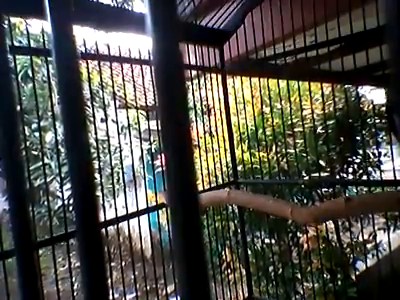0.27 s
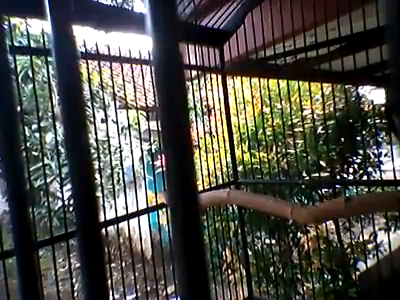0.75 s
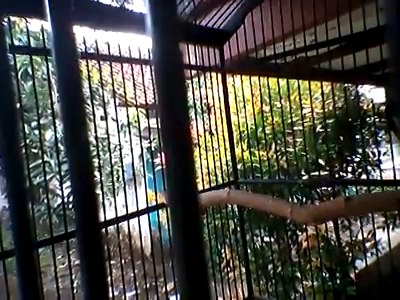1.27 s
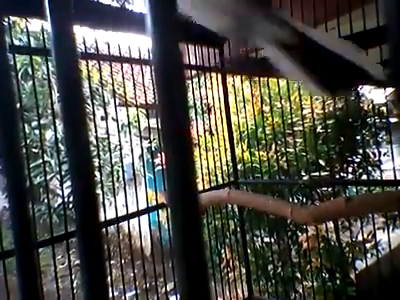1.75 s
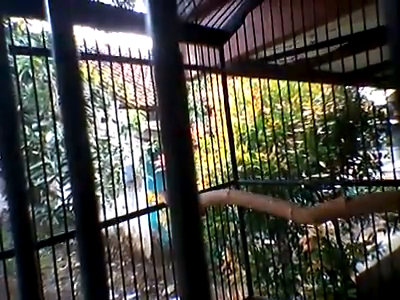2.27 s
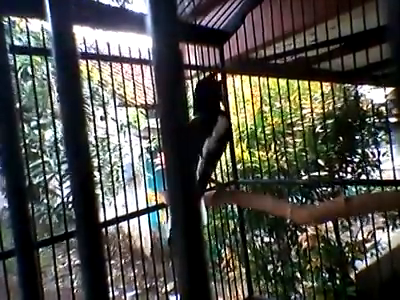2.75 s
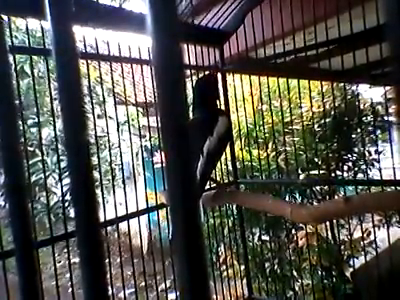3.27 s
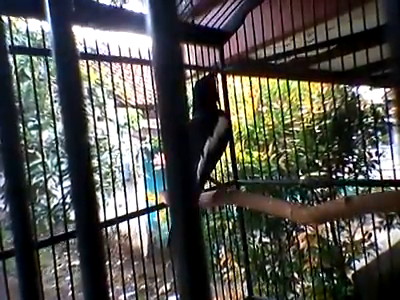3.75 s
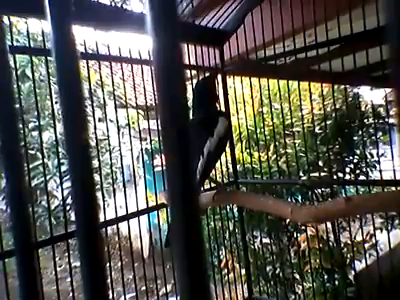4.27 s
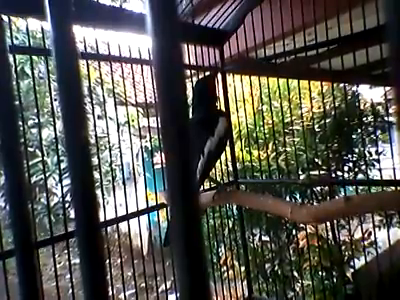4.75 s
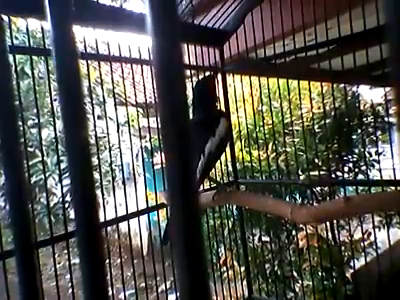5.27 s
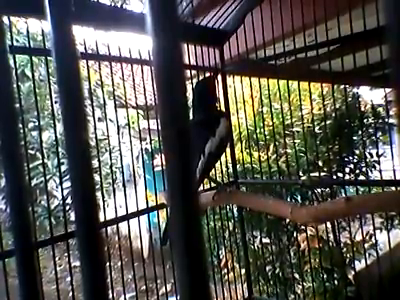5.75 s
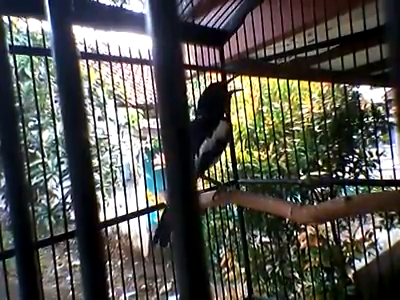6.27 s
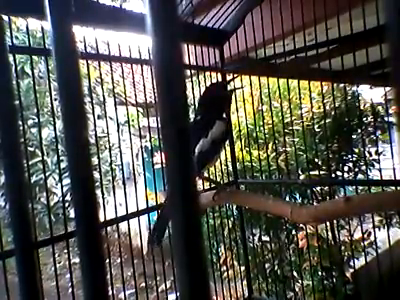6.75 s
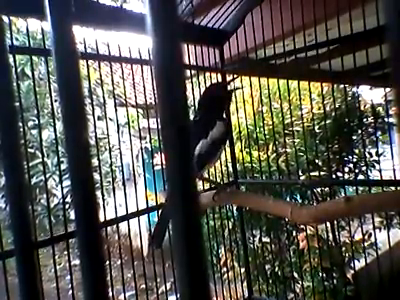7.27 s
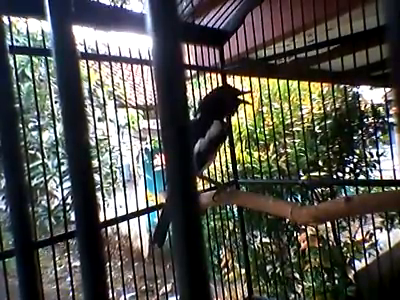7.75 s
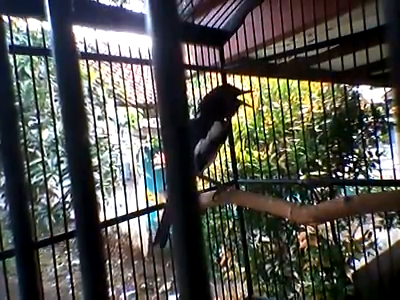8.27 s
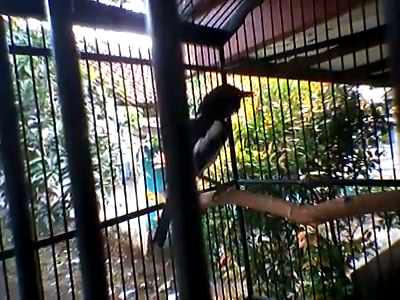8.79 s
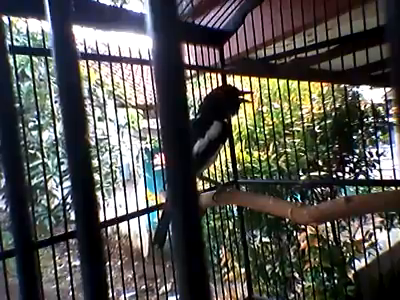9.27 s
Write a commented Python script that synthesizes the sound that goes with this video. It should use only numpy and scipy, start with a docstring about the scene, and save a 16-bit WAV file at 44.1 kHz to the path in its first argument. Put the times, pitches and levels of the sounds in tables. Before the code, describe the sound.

A caged songbird whistles a bright, squeaky bout, flutters across its cage, pauses while a distant bird answers and an engine passes, then sings again.

```python
"""A caged magpie-robin under a porch roof sings a first bout of whistles, sweeps and squeaks: near-sine notes
from two sides of its syrinx, raspy when swept fast or pressed hard. Late in the bout it flaps across the cage
and lands: puffs of shaped noise. An engine drones past: two wavering low orders and exhaust noise. In the
pause a bird answers from further off, dull and echoing. A second bout ends in chips, a falling trill and a
last scoop. Noise-made traffic murmurs throughout."""
import sys
import numpy as np
from scipy import signal
from scipy.fft import rfft, irfft, next_fast_len
from scipy.io import wavfile
from scipy.ndimage import uniform_filter1d

SR = 44100
rng = np.random.default_rng(int(sys.argv[2]) if len(sys.argv) > 2 else 0)


def output_pcm(signal):
    """Save a mono or channel-first signal as 16-bit PCM at the path in sys.argv[1].

    Samples are clipped to [-1, 1] before scaling.
    """
    pcm = np.clip(np.atleast_2d(signal).T, -1, 1) * 32767
    wavfile.write(sys.argv[1], SR, np.round(pcm).astype(np.int16))


N = 419832
TIME = np.arange(N) / SR

# Notes from the other side of the syrinx. Each row: start in seconds, length in seconds, first, middle and
# last pitch in Hz, relative level in dB, place of the crest (0-1), swell up to the crest in dB.
SECOND_VOICE_NOTES = [ (.881, .072, 4750, 3380, 2800, -21, .46, 17),
                      (7.568, .162, 3680, 3470, 3270, -26.5, .4, 20),
                      (9.028, .088, 1990, 2060, 2000, -36.5, .15, 2), ]


def caged_bird(coupling=4.0, overdrive=10, voice_db=3, beak_hz=9950, beak_db=6, lowest_hz=900):
    """The two sides of the syrinx give sum and difference tones; the open beak lifts one resonance."""
    one = sing(song())
    other = sing([arch(*row) for row in SECOND_VOICE_NOTES])
    mixed = coupling * one * other * (1 + overdrive * (one + other))
    mixed = signal.sosfilt(signal.butter(6, lowest_hz, "highpass", fs=SR, output="sos"), mixed)
    voice = gain_of(voice_db) * (one + other + mixed + cracks())
    resonance = signal.lfilter(*signal.iirpeak(beak_hz, 20, fs=SR), voice)
    return voice + gain_of(beak_db) * resonance


# Two long free glides, one list each. Each row: time in seconds, pitch in Hz, relative level in dB.
GLIDE_PATHS = [
    [(6.965, 3490, -36), (6.977, 3673, -27), (6.991, 3621, -24), (7.071, 3080, -20), (7.089, 3036, -28),
     (7.127, 2907, -22), (7.139, 2817, -30), (7.157, 2704, -20), (7.187, 2188, -23), (7.233, 1981, -19),
     (7.25, 1902, -39)],
    [(7.419, 3116, -40), (7.439, 3146, -20), (7.583, 2819, -32), (7.621, 2518, -27), (7.675, 2450, -26),
     (7.707, 2235, -35), (7.735, 2040, -25), (7.763, 2100, -34), (7.787, 2533, -19), (7.875, 2440, -22),
     (7.92, 2010, -40)],
]


def song():
    """Every note of the main voice, each as rows of (s, pitch Hz, relative level dB)."""
    kinds = [(arch, ARCHED_NOTES), (slur, SLUR_NOTES), (scoop, SCOOP_NOTES), (chirp, CHIRP_NOTES),
             (chip, CHIP_NOTES), (squeak, SQUEAK_NOTES), (trill, [TRILL_NOTE])]
    shaped = [shape(*row) for shape, table in kinds for row in table]
    return shaped + list(GLIDE_PATHS)


# Single arched notes. Each row: start in seconds, length in seconds, first, middle and last pitch in Hz,
# relative level in dB, place of the crest (0-1), swell up to the crest in dB.
ARCHED_NOTES = [ (0, .012, 2750, 2800, 2900, -24, .2, 3), (.082, .141, 3330, 3580, 3740, -12.5, .36, 21),
                (.285, .1, 3660, 3480, 3120, -15.3, .33, 10), (.487, .026, 2150, 1780, 2550, -27, .6, 11),
                (.508, .102, 3720, 3440, 2420, -17.2, .2, 5), (1.125, .104, 3230, 3200, 3150, -20, .37, 17),
                (1.24, .093, 3220, 3140, 3060, -20.3, .75, 14),
                (1.345, .075, 3090, 3080, 2880, -19.7, .5, 12),
                (1.911, .069, 5700, 4630, 4200, -28, .26, 21),
                (2.064, .138, 3640, 3450, 3100, -27.2, .85, 14),
                (2.54, .15, 3210, 3690, 3830, -26.8, .3, 19),
                (2.754, .114, 3630, 3440, 3200, -25.7, .25, 13),
                (2.945, .026, 2300, 1850, 2950, -32.5, .8, 7),
                (2.975, .102, 3800, 3370, 2400, -28.5, .85, 1),
                (6.228, .19, 3170, 3170, 3060, -19.8, .72, 15),
                (8.045, .041, 2720, 2790, 2580, -24.3, .75, 23),
                (8.113, .031, 3250, 3100, 2850, -15.5, .4, 26),
                (8.162, .092, 3530, 3535, 3430, -16, .33, 23),
                (8.299, .045, 2920, 2930, 2850, -19.2, .52, 13),
                (8.343, .061, 2900, 2990, 2850, -18.7, .52, 11),
                (9.03, .086, 1390, 1392, 1345, -25.5, .55, 9), ]
PROGRESS = np.linspace(0, 1, 200)  # share of any note elapsed
FADE_DB = 12  # end of an arched note, under its crest
HOOK_SHARE, HOOK_S = .045, .006  # starts flat by this share, slides up with this time constant
DROP_SHARE, DROP_S = .09, .005  # a falling note flicks down at its end


def arch(start, length, first_hz, middle_hz, last_hz, db, crest, swell_db):
    """The pitch hooks up and bends in one parabola while the level swells to a crest and fades."""
    t = length * PROGRESS
    parabola = np.polyfit([0, .5, 1], [first_hz, middle_hz, last_hz], deg=2)
    hz = np.polyval(parabola, PROGRESS)
    falling = last_hz < .97 * middle_hz
    hz = hz * (1 - DROP_SHARE * falling * np.exp((t - length) / DROP_S))
    hz = hz * (1 - HOOK_SHARE * np.exp(-t / HOOK_S))
    crest = np.clip(crest, .05, .95)
    curve_db = np.where(PROGRESS < crest, swell_db / crest ** 2, FADE_DB / (1 - crest) ** 2)
    return np.column_stack([start + t, hz, db - curve_db * (PROGRESS - crest) ** 2])


# Slurs. Each row: start in seconds, length in seconds, top, dip, rebound and last pitch in Hz,
# relative level in dB.
SLUR_NOTES = [(1.448, .318, 3030, 1900, 2420, 2230, -26), (6.442, .376, 3110, 2040, 2570, 2100, -23.5)]
SLUR_FALL_SHARE, SLUR_TURN_S, REBOUND_S = .49, .218, .034  # share spent falling; upturn time and duration
SAG_POWER = 2.5  # above 1 the closing sag comes late


def slur(start, length, top_hz, dip_hz, rebound_hz, last_hz, db):
    """A slow fall into a dip, a quick rebound and a closing sag."""
    t = length * PROGRESS
    sag = np.clip((t - SLUR_TURN_S) / (length - SLUR_TURN_S), 0, 1) ** SAG_POWER
    hz = top_hz + (dip_hz - top_hz) * ease(PROGRESS / SLUR_FALL_SHARE)
    hz = hz + (rebound_hz - dip_hz) * ease((t - SLUR_TURN_S) / REBOUND_S)
    hz = hz + (last_hz - rebound_hz) * sag
    return np.column_stack([start + t, hz, db + held(t)])


# Scoops. Each row: start in seconds, length in seconds, top, dip and held pitch in Hz,
# relative level of the dip and of the held note in dB, middle of the rise in seconds from the start.
SCOOP_NOTES = [(2.293, .165, 3000, 2390, 2750, -20, -25, .082),
               (9.283, .172, 3080, 2430, 2770, -16, -25, .073)]
SCOOP_FALL_S, SCOOP_RISE_S, SCOOP_SWELL_DB, SCOOP_GAP_DB = .05, .035, 22, 7


def scoop(start, length, top_hz, dip_hz, held_hz, dip_db, held_db, rise_at_s):
    """The note swells as it sinks into a dip, thins while it rises, and holds."""
    t = length * PROGRESS
    high = np.maximum(1 - t / SCOOP_FALL_S, 0) ** 2
    risen = ease((t - rise_at_s) / SCOOP_RISE_S + .5)
    hz = dip_hz + (top_hz - dip_hz) * high + (held_hz - dip_hz) * risen
    db = dip_db + (held_db - dip_db) * risen
    db = db - SCOOP_SWELL_DB * high - SCOOP_GAP_DB * np.sin(np.pi * risen)
    return np.column_stack([start + t, hz, db])


# Quick flicks. Each row: peak time in seconds, rise and fall in seconds, peak and foot pitch in Hz,
# relative level in dB.
CHIRP_NOTES = [ (.806, .03, .036, 3300, 1760, -23.5), (.884, .034, .028, 3320, 1800, -25),
               (8.541, .018, .008, 2750, 2400, -30), ]
CHIRP_POINT = 1.6  # above 1 the peak narrows


def chirp(peak_s, rise_s, fall_s, peak_hz, foot_hz, db):
    """A flick from the foot pitch over a rounded peak and back down."""
    t = (rise_s + fall_s) * PROGRESS
    height = ease(np.interp(t, [0, rise_s, t[-1]], [0, 1, 0])) ** CHIRP_POINT
    hz = foot_hz + (peak_hz - foot_hz) * height
    return np.column_stack([peak_s - rise_s + t, hz, db + held(t)])


# Chips. Each row: start in seconds, length in seconds, time to the snap in seconds, top and foot pitch
# in Hz, relative level in dB.
CHIP_NOTES = [ (8.549, .015, .007, 3250, 2400, -26), (8.6, .019, .0115, 3620, 2500, -29),
              (8.624, .008, .007, 3150, 2800, -31), (8.677, .028, .0135, 3580, 2480, -26.5), ]
SNAP_S, SNAP_DB, SNAP_THIN_DB = .005, 5.5, 4  # snap time constant, flare, thinness of the high part


def chip(start, length, snap_s, top_hz, foot_hz, db):
    """A thin high note snaps down, flaring as it passes the throat's resonance."""
    t = length * PROGRESS
    height = (1 - np.tanh((t - snap_s) / SNAP_S)) / 2
    flare = (4 * height * (1 - height)) ** 2
    hz = (foot_hz + (top_hz - foot_hz) * height) * (1 - HOOK_SHARE * np.exp(-t / HOOK_S))
    return np.column_stack([start + t, hz, db + SNAP_DB * flare - SNAP_THIN_DB * height])


# Squeaks. Each row: start in seconds, relative level in dB.
SQUEAK_NOTES = [(.623, -17), (3.095, -27)]
SQUEAK_RISE_S, SQUEAK_BREAK_S, SQUEAK_TAIL_S = .03, .003, .015
SQUEAK_FOOT_HZ, SQUEAK_TOP_HZ, SQUEAK_BREAK_HZ, SQUEAK_END_HZ = 3000, 5800, 3900, 4700
SQUEAK_THIN_DB, SQUEAK_FADE_DB = 11, 14  # drop at the very top and at the end


def squeak(start, db):
    """The pitch shoots up, thinning out, breaks to a louder, lower note, then climbs as it fades."""
    turns = np.cumsum([0, SQUEAK_RISE_S, SQUEAK_BREAK_S, SQUEAK_TAIL_S])
    t = turns[-1] * PROGRESS
    hz = np.interp(t, turns, [SQUEAK_FOOT_HZ, SQUEAK_TOP_HZ, SQUEAK_BREAK_HZ, SQUEAK_END_HZ])
    drop_db = np.interp(t, turns, [0, SQUEAK_THIN_DB, 0, SQUEAK_FADE_DB])
    drop_db = drop_db + SOFT_DB * np.maximum(1 - t / ATTACK_S, 0)
    return np.column_stack([start + t, hz, db - drop_db])


# The falling trill. One row: start in seconds, length in seconds, first and last pitch in Hz,
# relative level in dB, first crest in seconds.
TRILL_NOTE = (8.75, .16, 2130, 1480, -24, 8.78)
TRILL_RATE_HZ, TRILL_OCTAVES, TRILL_THROB_DB = 31.3, .23, 1.5
TRILL_LEAD_DB = 5  # the opening slide starts this much softer


def trill(start, length, first_hz, last_hz, db, crest_s):
    """A note slides softly up to its first crest, then falls in a fast warble, louder on each upswing."""
    t = length * PROGRESS
    lead_in = np.maximum(1 - t / (crest_s - start), 0)
    slide = 1.6 * (1 - lead_in) ** 2 - .6
    warble = np.cos(2 * np.pi * TRILL_RATE_HZ * (start + t - crest_s))
    swing = np.where(lead_in > 0, slide, warble)
    hz = first_hz * (last_hz / first_hz) ** PROGRESS * 2 ** (TRILL_OCTAVES * swing)
    db = db + held(t) + TRILL_THROB_DB * swing - TRILL_LEAD_DB * lead_in
    return np.column_stack([start + t, hz, db])


ATTACK_S, RELEASE_S, SOFT_DB = .007, .012, 11


def held(t):
    """Attack from SOFT_DB below, hold and release, in dB."""
    gate = np.minimum(t / ATTACK_S, (t[-1] - t) / RELEASE_S)
    return SOFT_DB * (np.minimum(gate, 1) - 1)


def sing(notes, warble=0.0032):
    """A row of notes in time; warble is the rms share by which their pitch trembles."""
    out = np.zeros(N)
    for rows in notes:
        add(out, *whistle(rows, warble))
    return out


# Pressure on the syrinx, which brings up overtones and rasp. Each row: time in seconds, force in dB.
SYRINX_FORCE = [(.42, -6), (.495, 6), (.93, 3), (2.15, 3), (2.42, -24), (2.6, 11), (3.13, 6), (6.25, -9),
                (6.63, 1), (7.3, -7), (7.7, 5), (8.2, -6), (8.6, 1), (8.82, -5), (9.3, -22)]
# Roughness, which clears for the closing chips and trill. Each row: time in seconds, added force in dB.
VOICE_ROUGHNESS = [(8.3, 0), (8.52, -6)]
# Overtones at the syrinx. Each row: multiple of the pitch, relative level in dB.
SYRINX_OVERTONES = [(2, -26), (3, -34), (4, -38)]
# What throat and beak let out of the overtones. Each row: frequency in Hz, gain in dB.
BEAK_RESPONSE = [(3600, 5), (4500, -4), (6400, 4), (7200, -3), (7900, -17), (9500, -3), (10500, -17),
                 (14200, -1)]


def whistle(rows, warble, sweep_jitter=0.016, fast_octaves_per_s=32, rasp_db=-18.5, steady_rasp=0.04,
            shake_db=1.8, flicker_db=3, edge_s=.005):
    """A near sine, which shakes and turns raspy when the membrane is swept fast or pressed hard."""
    s, pitch, level = np.transpose(rows)
    t = np.arange(s[0] - edge_s / 2, s[-1] + edge_s, 1 / SR)
    size = len(t)
    hz = uniform_filter1d(np.interp(t, s, pitch), size=90, mode="nearest")
    force = gain_of(np.interp(t, *np.transpose(SYRINX_FORCE)))
    rough = force * gain_of(np.interp(t, *np.transpose(VOICE_ROUGHNESS)))

    # fast sweeps unsettle the membrane, so its pitch and strength jitter
    octaves_per_s = abs(np.gradient(np.log2(hz))) * SR
    strain = np.minimum(octaves_per_s / fast_octaves_per_s, 1) ** 2
    tremble = warble * wander(size, rate_hz=160)
    tremble = tremble + rough * sweep_jitter * strain * wander(size, rate_hz=400)
    level = np.interp(t, s, level) + shake_db * np.sqrt(strain) * wander(size, rate_hz=250)
    phase = 2 * np.pi * np.cumsum(hz * (1 + tremble)) / SR

    overtones = 0
    for k, db in SYRINX_OVERTONES:
        gain = gain_of(db + read(BEAK_RESPONSE, k * hz) + flicker_db * wander(size, rate_hz=130))
        overtones = overtones + gain * np.sin(k * phase) * (k * hz < SR / 2)
    rasp = gain_of(rasp_db) * (steady_rasp + strain) * hoarse(size, hz.mean())
    gate = ease(np.minimum(t - t[0], t[-1] - t) / edge_s)
    return t[0], gate * gain_of(level) * (np.sin(phase) + force * overtones + rough * rasp)


# Spectrum of the rasp. Each row: multiple of the pitch, relative level in dB.
RASP_SPECTRUM = [(.3, -55), (.9, 0), (1.2, -5), (1.6, -19), (4, -48)]


def hoarse(size, centre_hz):
    """The noise of a membrane vibrating irregularly about one pitch."""
    return noise(size, [(k * centre_hz, db) for k, db in RASP_SPECTRUM])


# Moments where the voice cracks. Each row: start in seconds, length in seconds, centre in Hz,
# relative level in dB.
VOICE_CRACKS = [(.492, .026, 3500, -26), (.655, .02, 4700, -23), (2.957, .026, 3700, -34),
                (3.125, .035, 4700, -32), (9.028, .032, 1850, -35)]


def cracks(rise_s=.002, fade_db=7):
    """Rough bursts that start abruptly and fade as the tone takes over."""
    out = np.zeros(N)
    for start, length, centre_hz, db in VOICE_CRACKS:
        t = np.arange(0, length, 1 / SR)
        gate = ease(np.minimum(t, length - t) / rise_s)
        level = gain_of(db - fade_db * t / length)
        add(out, start, gate * level * hoarse(len(t), centre_hz))
    return out


# Wing beats and the landing. Each row: start in seconds, relative level in dB, decay constant in seconds,
# treble tilt in dB per octave.
WING_BEATS = [(1.99, -22.5, 0.0072, 6.5), (2.001, -27, 0.0055, 0.5), (2.387, -36.5, 0.0071, 5.5),
              (2.56, -25.5, 0.007, -3)]
# Spectrum of a beat before its tilt. Each row: frequency in Hz, relative level in dB.
WING_SPECTRUM = [(45, -47), (370, 2), (1000, 7), (2000, -3.5), (5000, -13.5), (15000, -46.5)]


def wings(rise_s=0.0034):
    """Each beat is a puff of air and feathers brushing the bars."""
    out, t = np.zeros(N), np.arange(SR // 4) / SR
    for s, db, decay, tilt_db in WING_BEATS:
        blow = np.minimum(t / rise_s, 1) * np.exp(-t / decay) * (1 + t / decay)
        add(out, s, gain_of(db) * blow * noise(len(t), WING_SPECTRUM, tilt_db))
    return out


# Extra scatter while the bird moves about and faces away. Each row: time in seconds, gain in dB.
SCATTER_TURNED_AWAY = [(1.7, 0), (2.6, 4), (3.2, 5), (6, 0)]
# Close reflections from perch, wall and roof. Each row: delay in seconds, amplitude share.
CLOSE_ECHOES = [(.0045, 0.14), (.0085, .14)]


def porch(x, near_db=-10, late_db=-19, beamed=.4, beam_hz=5200):
    """Hard echoes, quick roof scatter and a fainter yard ring; beamed treble arrives more scattered."""
    highpass = signal.butter(2, beam_hz, "highpass", fs=SR, output="sos")
    treble = beamed * signal.sosfiltfilt(highpass, x)
    scattered = (x + 2 * treble) * gain_of(np.interp(TIME, *np.transpose(SCATTER_TURNED_AWAY)))
    near = gain_of(near_db) * tail(scattered, t60=.11, gap_s=.005)
    late = gain_of(late_db) * tail(x, t60=0.42, gap_s=0.029)
    out = x - treble + near + late
    for delay, share in CLOSE_ECHOES:
        add(out, delay, share * x)
    return out


# Notes of the distant bird. Each row: start in seconds, length in seconds, first, middle and last pitch
# in Hz, relative level in dB, warble as a share of the pitch.
DISTANT_NOTES = [ (3.68, .22, 2700, 2950, 3000, -44.5, .012), (3.99, .29, 3220, 3380, 3410, -46.5, .012),
                 (4.22, .16, 3270, 3100, 3000, -47.5, .015), (4.44, .2, 2170, 2340, 2360, -39, .01),
                 (4.735, .08, 3700, 3660, 3660, -44.5, .005), (4.88, .09, 3030, 3020, 3020, -46, .004),
                 (4.915, .21, 2420, 2620, 2720, -43, .035), (5.175, .085, 2500, 2220, 2150, -36, .035),
                 (5.39, .14, 3050, 2880, 2650, -46, .022), (5.525, .135, 2420, 2260, 2230, -44.5, .025), ]


def distant_bird(far_db=1.3, crest=.52, swell_db=5):
    """Far whistles, some clear and some fluttering, arrive dull and mostly as echoes, smeared by the yard."""
    notes = np.zeros(N)
    for *note, warble in DISTANT_NOTES:
        notes += sing([arch(*note, crest, swell_db)], warble)
    notes = signal.sosfilt(signal.butter(10, 3900, fs=SR, output="sos"), notes)
    return gain_of(far_db) * (notes / 2 + tail(notes, t60=.45, gap_s=.002))


# The street. Each row: time in seconds, traffic level in dB, engine firing rate in Hz,
# engine level before the boom in dB, exhaust level in dB.
STREET_COURSE = [(0, -54, 62, -78, -66), (2.098, -52, 65.24, -63, -60), (3.2, -51.5, 67.3, -64, -51),
                 (4.65, -51, 71.46, -57, -51), (6, -56.5, 72.1, -75.5, -66), (8.798, -55, 64.1, -70, -72)]
# Engine orders. Each row: multiple of the firing rate, relative level in dB.
ORDER_LEVELS = [(2, -2), (3, -11)]
# Spectra of traffic and exhaust. Each row: frequency in Hz, relative level in dB.
TRAFFIC_SPECTRUM = [(50, -43), (135, -14), (260, -3.5), (800, -11.5), (2300, -18.5), (3200, -25),
                    (15000, -31.5)]
EXHAUST_SPECTRUM = [(200, -30), (445, 0), (1400, -14), (4000, -36)]


def street(swell_db=1.4, waver=0.0053, boom_hz=215, boom_db=9):
    """Far traffic wash, exhaust noise and wavering engine orders that boom at a porch resonance."""
    s, *columns = np.transpose(STREET_COURSE)
    traffic_db, rate, engine_db, exhaust_db = (np.interp(TIME, s, c) for c in columns)
    phase = 2 * np.pi * np.cumsum(rate * (1 + waver * wander(N, rate_hz=10))) / SR
    drone = np.zeros(N)
    for k, db in ORDER_LEVELS:
        drone += gain_of(db + 2 * wander(N, rate_hz=4)) * np.sin(k * phase)
    drone = evened(drone)
    boom = signal.lfilter(*signal.iirpeak(boom_hz, 20, fs=SR), drone)
    engine = gain_of(engine_db) * (drone + gain_of(boom_db) * boom)
    wash = gain_of(traffic_db + swell_db * wander(N, rate_hz=5)) * noise(N, TRAFFIC_SPECTRUM)
    exhaust = gain_of(exhaust_db) * noise(N, EXHAUST_SPECTRUM)
    return wash + engine + exhaust


def tail(x, t60, gap_s):
    """Diffuse reflections: dense random taps that start after a gap and die away."""
    t = np.arange(SR) / SR
    taps = rng.standard_normal(SR) * gain_of(-60 * t / t60) * (t > gap_s)
    return signal.fftconvolve(x, taps / np.linalg.norm(taps))[:N]


def noise(size, colour, tilt_db=0):
    """Unit-rms noise with a given spectrum, tilted in dB per octave about 1 kHz."""
    hz = np.fft.rfftfreq(size, 1 / SR)
    db = read(colour, hz) + tilt_db * np.log2((hz + 1) / 10 ** 3)
    return evened(irfft(rfft(rng.standard_normal(size)) * gain_of(db), size))


def wander(size, rate_hz):
    """Random drift of about unit rms, its spectrum falling steeply above rate_hz."""
    padded = next_fast_len(size + SR // 16, True)
    hz = np.fft.rfftfreq(padded, 1 / SR)
    spectrum = rfft(rng.standard_normal(padded)) / (1 + (hz / rate_hz) ** 2) ** 2
    return evened(irfft(spectrum, padded))[:size]


def read(points, hz):
    """A spectrum, joined by straight lines on a log-frequency axis."""
    f, value = np.transpose(points)
    return np.interp(np.log(hz + 1), np.log(f + 1), value)


def ease(u):
    """A smooth step from 0 to 1."""
    return np.sin(np.pi / 2 * np.clip(u, 0, 1)) ** 2


def gain_of(db):
    """Decibels to a gain."""
    return 10 ** (np.asarray(db) / 20)


def evened(x):
    """Scaled to unit rms."""
    return x / np.sqrt(np.mean(x ** 2) + 1e-20)


def add(mix, s, sound):
    """Mixes a sound in at time s."""
    part = mix[max(round(s * SR), 0):][:len(sound)]
    part += sound[:len(part)]


def scene():
    """The cage under the porch, with the yard and street behind it, in mono."""
    cage = porch(caged_bird() + wings())
    return (cage + distant_bird() + street())[None]


def record(dry, image_db=-36, shift_hz=10500, edge_hz=15750):
    """Faint copies of the sound above 2.6 kHz sit shifted up in the treble; then the band limit."""
    highpass = signal.butter(2, 2600, "highpass", fs=SR, output="sos")
    whistles = signal.hilbert(signal.sosfilt(highpass, dry))
    images = (whistles * gain_of(image_db) * np.exp(2j * np.pi * shift_hz * TIME)).real
    lowpass = signal.firwin(511, edge_hz, window=("kaiser", 9), fs=SR)
    return signal.oaconvolve(dry + images, lowpass[None], "same")


dry = scene()
out = record(dry)
output_pcm(out)
```